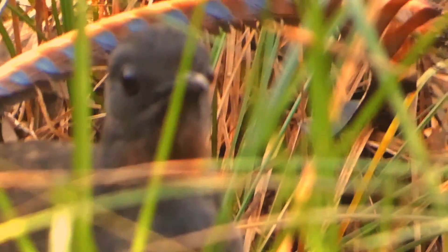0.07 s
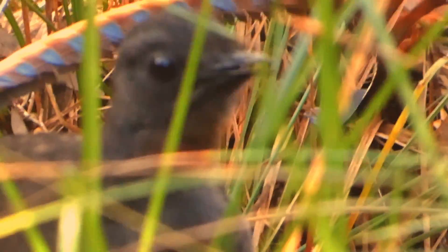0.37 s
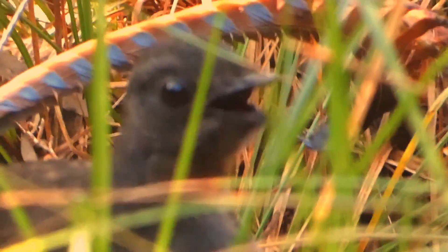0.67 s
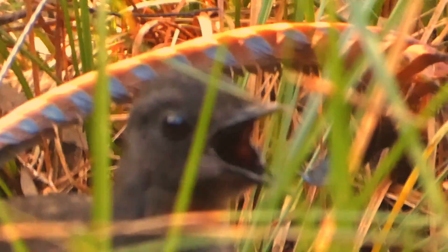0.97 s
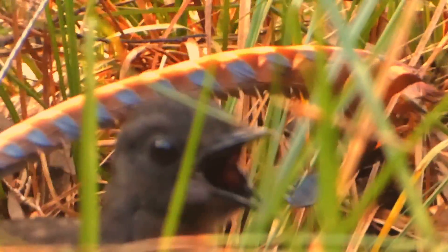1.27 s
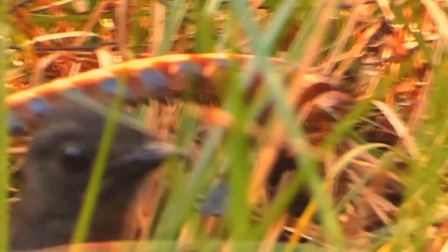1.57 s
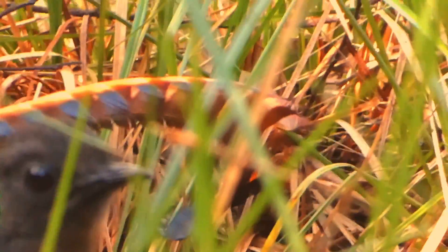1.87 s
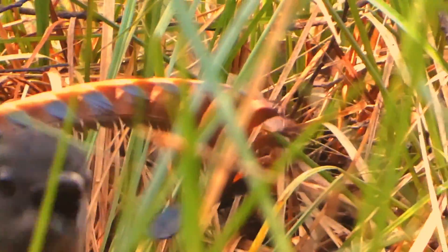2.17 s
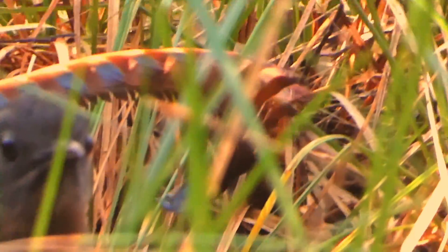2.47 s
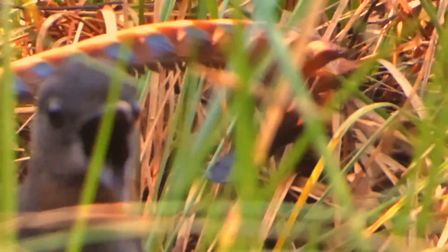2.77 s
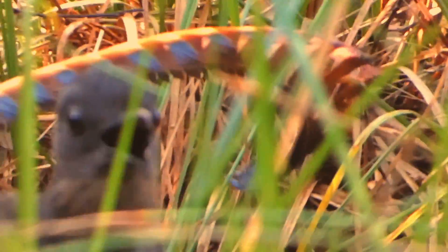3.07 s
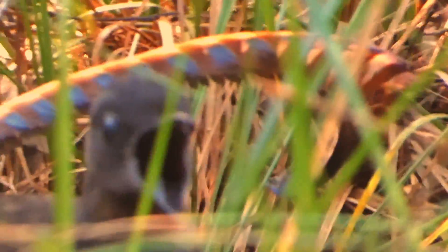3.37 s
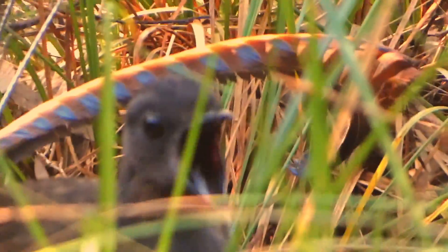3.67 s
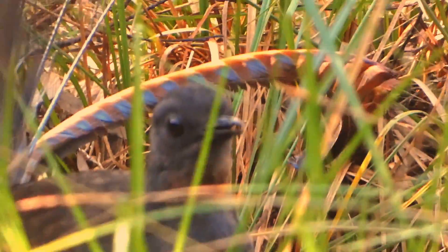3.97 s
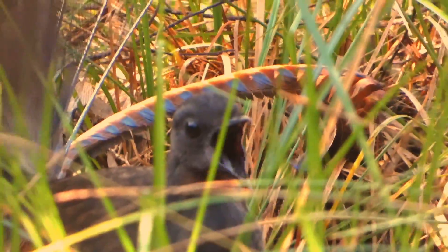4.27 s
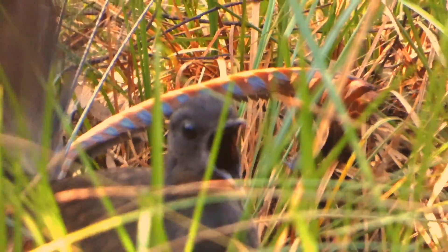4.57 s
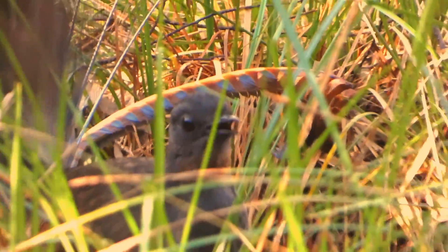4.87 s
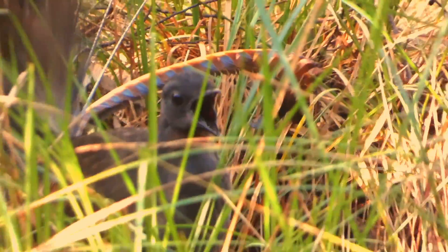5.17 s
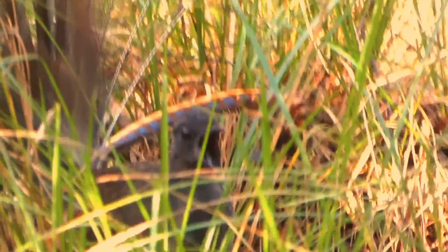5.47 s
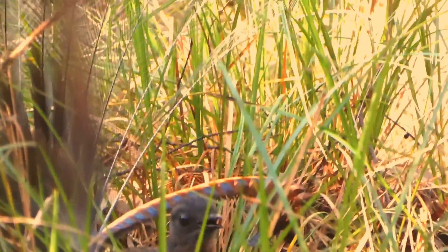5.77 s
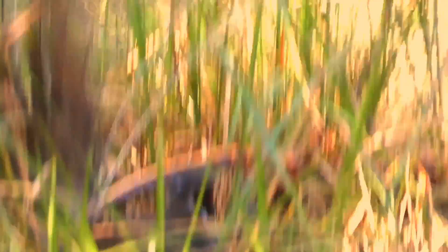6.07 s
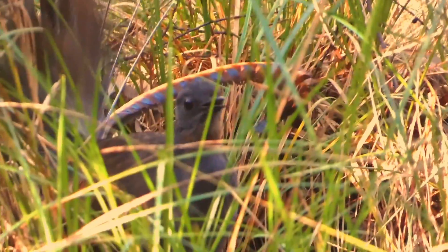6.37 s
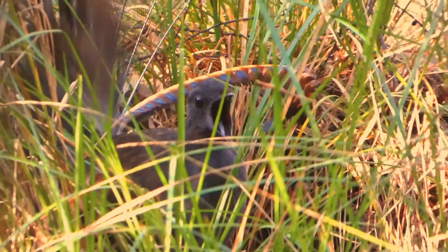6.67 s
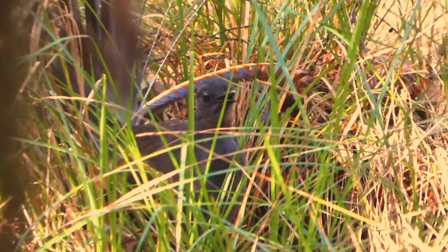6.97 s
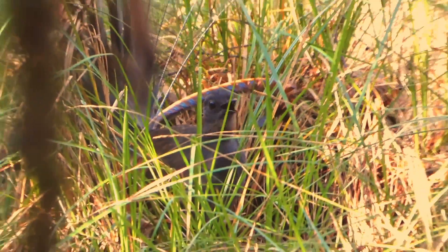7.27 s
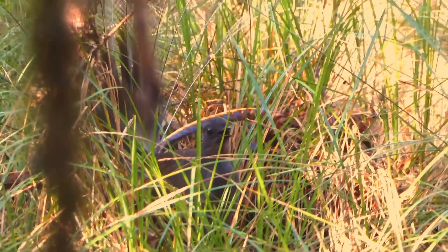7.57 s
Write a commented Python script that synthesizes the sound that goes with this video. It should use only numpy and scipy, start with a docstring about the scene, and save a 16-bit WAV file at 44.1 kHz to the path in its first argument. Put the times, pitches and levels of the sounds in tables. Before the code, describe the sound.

In a still forest, with faint air noise and far-off birds behind it, one nearby lyrebird calls from straight ahead. Four sharp clicks come first, then two clipped, buzzy squawks and two long downward whistles. Small croaks, a whip-like sweep and a swelling note lead to three quick rasping rattles, then a string of loud, mostly falling whistles. The calls are clear and leave a short natural ring.

```python
"""A faint rustle of air and far-off twittering birds lie under a lyrebird singing from the grass close by.
It opens with four clicks, snaps of air that set its syrinx ringing, then two hoarse squawks that buzz
through the windpipe. Whistles follow, gliding through the throat's resonance, the fastest like
whip-cracks, with pulsed croaks, rasping rattles and a few dry ticks among them.
Undergrowth scatters each call and the forest lets it ring on."""
import sys
import numpy as np
from scipy import signal
from scipy.fft import rfft, irfft
from scipy.io import wavfile

SR = 44100
rng = np.random.default_rng(int(sys.argv[2]) if len(sys.argv) > 2 else 0)


def master(y):
    """Save y as 16-bit WAV."""
    cut = np.clip(np.atleast_2d(y).T, -1, 1)
    pcm = np.round(cut * 32767)  # scale
    wavfile.write(sys.argv[1], SR, pcm.astype(np.int16))


N = 345303
HZ = np.fft.rfftfreq(N, 1 / SR)
TOP_HZ = 15750


def amp(db):
    """Decibels to gain."""
    return 10 ** (np.asarray(db) / 20)


def unit(x):
    """Scales to rms 1."""
    return x / np.sqrt(np.mean(x ** 2) + 1e-20)


def curve(points, hz, column=1):
    """Reads one column of a table on a log-frequency axis."""
    table = np.transpose(points)
    return np.interp(np.log(hz + 1), np.log(table[0] + 1), table[column])


def resonances(peaks):
    """Bell-shaped peaks as an EQ curve in dB."""
    return sum(db / (1 + (2 * (HZ - hz) / width) ** 2) for hz, width, db in peaks)


def noise(eq_db):
    """Noise of rms 1, coloured by an EQ curve."""
    return unit(irfft(rfft(rng.standard_normal(N)) * amp(eq_db), N))


def wander(n, hz):
    """Random modulation of rms near 1, changing hz times a second."""
    return np.interp(np.arange(n) * hz / SR, np.arange(32768), rng.standard_normal(32768))


def blur(n, width_hz):
    """Complex modulation of rms 1 that smears a tone into a band."""
    return (unit(wander(n, width_hz)) + 1j * unit(wander(n, width_hz))) / np.sqrt(2)


def add(mix, start_s, sound):
    """Mixes a sound in at start_s."""
    part = mix[max(round(start_s * SR), 0):][:len(sound)]
    part += sound[:len(part)]


def gate(t, length, attack, release):
    """Fades in from zero and has faded out again at length."""
    fade_in = np.sin(np.pi / 2 * np.clip(t / attack, 0, 1)) ** 2
    fade_out = np.sin(np.pi / 2 * np.clip((length - t) / release, 0, 1)) ** 2
    return fade_in * fade_out


def burst(t, peak_s):
    """Percussive envelope that reaches 1 at peak_s and dies away."""
    return (t / peak_s) ** 2 * np.exp(2 * (1 - t / peak_s))


# Colour of the air bed: freq_hz, gain_db
AIR_EQ = [(12, -85), (20, -56), (109, -14.5), (252, -17), (333, -10.5), (534, -8), (667, -5), (985, -9.5),
          (1300, -5.5), (1540, -29.5), (1720, -15), (2680, -22), (3000, -26), (7730, -35), (15500, -50.5)]
# Low hums in the bed: freq_hz, width_hz, boost_db
AIR_PEAKS = [(148.7, 20, 9.5), (337, 40, 10.5), (444.5, 9.3, 8)]
# How the bed's level changes over time: time_s, level_db
AIR_LEVEL = [(0.0, -53), (3.4, -52.5), (4.2, -52.5), (4.602, -57), (5.4, -54), (6.3, -58.5), (7.83, -59)]
# Stereo likeness of the bed: freq_hz, correlation
AIR_STEREO = [(50, 0.08), (300, 0.027), (700, 0.04), (1500, 0.057), (10000, 0.9)]
# Balance of the bed: freq_hz, left_minus_right_db
AIR_PAN = [(60, 3.5), (150, -1.5), (330, -6.5), (700, -4), (2000, -5), (10000, 2.5)]


def air(trim_db=2):
    """A faint, wide bed of distant rustle and hum, its level wavering gently."""
    colour = curve(AIR_EQ, HZ) + resonances(AIR_PEAKS)
    left, other = rfft(noise(colour)), rfft(noise(colour))
    likeness = np.clip(curve(AIR_STEREO, HZ), -1, 1)
    right = likeness * left + np.sqrt(1 - likeness ** 2) * other
    pan = amp(curve(AIR_PAN, HZ) / 2)
    bed = irfft(np.array([left * pan, right / pan]), N)
    bed_level_db = np.interp(np.arange(N) / SR, *np.transpose(AIR_LEVEL))
    return bed * amp(trim_db + bed_level_db + .8 * wander(N, 6))


# Steady background layers: start_s, end_s, centre_hz, width_hz, level_db
DRONE_BANDS = [(-0.5, 4.2, 654, 33, -57.5), (2.5, 9.4, 574.3, 31.3, -61.5), (4.502, 9.2, 238, 87.48, -68.5),
               (-0.5, 0.66, 112, 20.37, -68.5), (-0.5, 9, 40, 55.6, -85), (4.2, 9, 9260, 4320, -67.5)]


def drones():
    """Bands of faint noise: far hums, low rumbles and a thin hiss."""
    t, out = np.arange(N) / SR, np.zeros((2, N))
    for start, end, hz, width, db in DRONE_BANDS:
        band_db = np.maximum(-12 * ((HZ - hz) / width) ** 2, -100)
        envelope = amp(db) * gate(t - start, end - start, 0.063, 0.077)
        out += envelope * np.array([noise(band_db), noise(band_db)])
    return out


# Short reverb of the nearby grass: freq_hz, t60_s, level_db, stereo_correlation
GRASS_REVERB = [(496, 0.05, 6.5, 1), (1530, 0.08, -10.5, 0.45), (2890, 0.28, -3, 0.78), (5740, 0.33, -5, 1),
                (9930, 0.27, -0.5, 0.17), (15000, 0.17, 2, 0.18)]
# Long ring of the forest: freq_hz, t60_s, level_db, stereo_correlation
FOREST_REVERB = [(500, 0.85, -6, 0.2), (1390, 0.78, -6.5, 0.53), (2450, 1.056, -13, 0.76),
                 (3830, 1.01, -9, 0.96), (6800, 0.29, -12.5, 0.2), (14150, 0.59, -29, .3)]


def scatter(sound, bands, attack_s):
    """Many small echoes from stems and trunks, each band dying at its own speed."""
    taps = rng.standard_normal((2, SR)) * (rng.random((2, SR)) < 1 / 8)
    hz, t, spectra = signal.stft(unit(taps), SR, nperseg=256)
    t60, db, likeness = (curve(bands, hz, column=k)[:, None] for k in range(1, 4))
    likeness = np.clip(likeness, 0, 1)
    spectra[1] = likeness * spectra[0] + np.sqrt(1 - likeness ** 2) * spectra[1]
    equal_energy = np.sqrt(2 * np.log(1000) / (t60 * SR))
    spectra *= amp(db - 60 * t / t60) * equal_energy
    fade_in = np.clip(np.arange(SR) / SR / attack_s, 0, 1)
    tail = signal.istft(spectra, SR, nperseg=256)[1][:, :SR] * fade_in
    return signal.fftconvolve(sound[None], tail, axes=1)[:, :N]


# Thin notes and wheezes: start_s, length_s, first_hz, last_hz, width_hz, level_db
TWITTER_NOTES = [(.07, 0.062, 5100, 5800, 1190, -68), (0.22, 0.066, 5900, 6700, 600, -66),
                 (0.464, 0.063, 3100, 4720, 405, -65), (0.818, 0.043, 3540, 3340, 403, -64),
                 (1.044, .11, 6000, 7000, 1250, -63.5), (1.24, 0.061, 3260, 2960, 910, -52),
                 (1.553, 0.047, 4210, 4400, 412, -62.5), (1.593, 0.17, 7000, 6860, 1860, -67.5),
                 (4.067, 0.19, 7150, 8450, 843, -63.5), (4.44, .1, 5840, 6040, 903, -59.5),
                 (6.852, 0.18, 7580, 8240, 580, -64.5), (7.504, 0.28, 1520, 1488, 106.7, -41),
                 (7.557, 0.13, 4480, 4670, 2020, -50)]


def twitters():
    """Far-off birds, each note a glide blurred into a band of noise."""
    out = np.zeros(N)
    for start, length, first_hz, last_hz, width, db in TWITTER_NOTES:
        n = int(length * SR)
        glide = np.exp(2j * np.pi * np.cumsum(np.linspace(first_hz, last_hz, n)) / SR)
        note = unit((glide * blur(n, width)).real)
        add(out, start, amp(db) * note * signal.windows.tukey(n, .6))
    return out


# Dry ticks: start_s, level_db
TICK_HITS = [(4.2436, -43), (4.301, -35.5), (6.824, -36)]
# Their bright colour: freq_hz, gain_db
TICK_EQ = [(1000, -17), (3000, -5), (6000, 4), (10000, 1.5), (15000, -21)]


def ticks(decay_s=0.0018):
    """Tiny bright bursts of noise, perhaps the beak or a dry stem."""
    envelope = np.zeros(N)
    for start, db in TICK_HITS:
        add(envelope, start, amp(db) * np.exp(-np.arange(1000) / SR / decay_s))
    return envelope * noise(curve(TICK_EQ, HZ))


# Rough breath in croaks, rattles and the tails of clicks: freq_hz, gain_db
RASP_EQ = [(300, -54.5), (600, -14), (950, -5), (1250, -23.5), (1520, -12), (1900, 6), (2900, -1.5),
           (3300, -4.5), (3900, 1), (4400, -4), (5200, -0.5), (7000, -11.5), (7700, -15.5), (8700, -28),
           (12000, -21), (15000, -40)]
# Croaks, the shortest a single pulse: start_s, length_s, pitch_hz, tone_db, breath_db
CROAK_RUNS = [(3.343, 0.01, 1610, -28, -31.5), (3.356, 0.03, 1815, -28, -29),
              (3.429, 0.004, 2270, -36, -33.5), (3.443, 0.02, 1390, -32, -33),
              (5.105, 0.024, 2030, -36, -41.5), (5.152, 0.004, 1960, -30, -39),
              (5.18, 0.004, 1060, -43.5, -48), (5.226, 0.004, 2140, -34, -50),
              (6.813, 0.028, 2576, -24, -40)]


def croaks(rate_hz=180, pulse_s=0.0036, fade_db=-7.5, pitch_spread=0.14, uneven_db=2):
    """Short fading runs of syrinx pulses, each a few cycles of tone with a puff of rough air."""
    out, breath, t = np.zeros(N), np.zeros(N), np.arange(-1000, 1000) / SR
    for start, length, hz, tone_db, breath_db in CROAK_RUNS:
        for delay in np.arange(0, length, 1 / rate_hz):
            size, detune = rng.standard_normal(2)
            pulse = amp(fade_db * delay / length + uneven_db * size) * np.exp(-2 * (t / pulse_s) ** 2)
            tone = np.sqrt(2) * np.sin(2 * np.pi * hz * (1 + pitch_spread * detune) * t)
            add(out, start + delay + t[0], amp(tone_db) * pulse * tone)
            add(breath, start + delay + t[0], amp(breath_db) * pulse)
    return out + breath * noise(curve(RASP_EQ, HZ))


# Hoarse squawks: start_s, length_s, level_db
SQUAWK_CALLS = [(2.013, 0.038, -34.5), (2.23, 0.0383, -33.5)]
# Their broad colour: freq_hz, gain_db
SQUAWK_EQ = [(240, -63), (400, -40), (1250, -10.5), (1520, -34.5), (1970, -17.5), (2510, -18.5),
             (2740, -22), (3720, -23), (4960, -16), (6610, -24.5), (9660, -19.5), (12900, -34),
             (15000, -59)]
# Formants of the windpipe: freq_hz, width_hz, boost_db
WINDPIPE_PEAKS = [(1150, 120, 2), (1880, 340, 16), (2465, 380, 14), (3000, 310, 15.5), (3710, 380, 17.5),
                  (4916, 180, 12.5)]


def squawks(top_pitch_hz=252, arch=0.0727, voiced_share=0.81):
    """A hoarse buzz with an arching pitch swells through the windpipe's resonances and is cut off."""
    voice, breath, t = np.zeros(N), np.zeros(N), np.arange(3000) / SR
    for start, length, db in SQUAWK_CALLS:
        swell = amp(db) * gate(t, length, 0.016, 0.0011)
        hz = top_pitch_hz * (1 - arch * (2 * t / length - 1) ** 2)
        phase = 2 * np.pi * np.cumsum(hz) / SR
        buzz = sum(np.cos(k * phase + rng.uniform(0, 2 * np.pi)) for k in range(1, 56))
        add(voice, start, swell * unit(buzz))
        add(breath, start, swell)
    source = np.sqrt(voiced_share) * voice + np.sqrt(1 - voiced_share) * breath * rng.standard_normal(N)
    windpipe = unit(amp(curve(SQUAWK_EQ, HZ) + resonances(WINDPIPE_PEAKS)))
    return irfft(rfft(source) * windpipe, N)


# Rattles: start_s, length_s, chirp_s, rate_hz, first_hz, last_hz, tone_db, tone_length_s, breath_db
RATTLE_CALLS = [(4.227, 0.16, 0.0019, 72, 2130, 1787, -33.5, 0.15, -43.5),
                (5.255, 0.16, 0.015, 140, 2158, 1603, -24.5, 0.083, -38),
                (5.398, 0.18, 0.0176, 160, 2220, 1534, -23, 0.088, -35.5),
                (5.56, 0.13, 0.017, 150, 2215, 1525, -21, 0.084, -32)]


def rattles(chirp_depth=0.583, fade_db_per_s=-85, breath_fade_db=-5, breath_pulsing=0.35,
            sideband_db=-11, smear_hz=260, breath_lead_s=0.0057):
    """A rising chirp breaks into a fast train of fading pulses whose pitch sags, wrapped in rough air."""
    out, breath = np.zeros(N), np.zeros(N)
    for start, length, chirp_s, rate, first_hz, last_hz, tone_db, tone_s, breath_db in RATTLE_CALLS:
        t = np.arange(0, length, 1 / SR)
        broken = np.clip((t - chirp_s) / 0.0054 + 1, 0, 1)  # 0 in the chirp, 1 in the pulse train
        cycles = np.cumsum(broken * rate * (1 + .07 * wander(len(t), 100))) / SR
        pulse = np.sin(np.pi * cycles) ** 6 * amp(1.8 * wander(len(t), 170))
        chirp = 1 + (1 - broken) * chirp_depth * (np.sqrt(t / chirp_s) - .7)
        hz = (first_hz + (last_hz - first_hz) * t / length) * chirp
        phase = 2 * np.pi * np.cumsum(hz * (1 + .03 * broken * wander(len(t), 700))) / SR
        envelope = amp(tone_db + fade_db_per_s * t) * gate(t, tone_s, .011, 0.02)
        tone = envelope * (1 - broken + broken * pulse) * np.sin(phase)
        push = amp(breath_db + breath_fade_db * t / length) * gate(t, length, 0.017, 0.051)
        # strong and weak cycles alternate unevenly: smeared tones an octave below and a fifth above
        sidebands = amp(sideband_db) * (np.exp(.5j * phase) + np.exp(1.5j * phase))
        add(out, start, np.sqrt(2) * tone + push * (sidebands * blur(len(t), smear_hz)).real)
        add(breath, start - breath_lead_s, push * (1 + breath_pulsing * (2 * pulse - .5)))
    return out + breath * noise(curve(RASP_EQ, HZ))


# Opening clicks: start_s, low_hz, high_hz, attack_db, held_db, held_s, snap_db, tail_db
CLICK_CALLS = [(0.2681, 1657, 2354, -28, -28.5, 0.04, -30.5, -54),
               (0.569, 1757, 2454, -21.5, -23, 0.029, -26.5, -47),
               (0.9451, 1757, 2400, -20.5, -30, 0.027, -23, -50),
               (1.298, 1755, 3270, -35, -66, .01, -33.5, -39)]
# Colour of the snap of air: freq_hz, gain_db
SNAP_EQ = [(300, -48.5), (700, -3), (1200, -7.5), (2000, 10), (4200, -1), (5200, -16), (6300, -42),
           (7700, -5.5), (8500, -23), (9500, -13), (11500, -29), (15000, -36)]
# A notch and four peaks in the snap: freq_hz, width_hz, gain_db
SNAP_BELLS = [(2750, 110, -17), (3240, 240, 3.5), (4240, 460, 3.5), (4900, 420, 7.5), (9250, 400, 8.5)]


def clicks(tone_peak_s=0.0027, snap_peak_s=0.0024, low_fade_db=-10, high_attack_db=-2,
           held_breath_db=-11, tail_decay_s=0.04):
    """A snap of air starts a rough tone on each side of the syrinx; both die or hold, rising slightly."""
    out, snaps, tails, t = np.zeros(N), np.zeros(N), np.zeros(N), np.arange(6000) / SR
    for start, low_hz, high_hz, attack_db, held_db, held_s, snap_db, tail_db in CLICK_CALLS:
        attack = amp(attack_db) * burst(t, tone_peak_s)
        held = amp(held_db) * gate(t, held_s, 0.021, 0.0034)
        low_envelope = attack + amp(low_fade_db * t / held_s) * held
        high_envelope = amp(high_attack_db) * attack + held
        for hz, envelope in ((low_hz, low_envelope), (high_hz, high_envelope)):
            rough_rise = .98 + t + .03 * wander(len(t), 900)
            phase = 2 * np.pi * np.cumsum(hz * rough_rise) / SR
            add(out, start, np.sqrt(2) * envelope * np.sin(phase))
        add(snaps, start, amp(snap_db) * burst(t, snap_peak_s) + amp(held_breath_db) * held)
        add(tails, start, amp(tail_db) * np.exp(-t / tail_decay_s) * gate(t, t[-1], 0.00078, 0.052))
    snap_noise = noise(curve(SNAP_EQ, HZ) + resonances(SNAP_BELLS))
    return out + snaps * snap_noise + tails * noise(curve(RASP_EQ, HZ))


# Resonance of the throat, loudest in the middle of the range: freq_hz, gain_db
THROAT_EQ = [(700, -32), (1100, -13), (1350, -17), (1750, -5), (2400, -1), (3200, -5), (3900, -18.5),
             (5000, -12.5)]
# How the open beak passes overtones: freq_hz, gain_db
BEAK_EQ = [(2000, -9), (4700, -12), (5400, -3), (6200, 1), (7700, -12), (9300, 3), (10500, 1), (13000, -5),
           (14000, -14), (15500, -20)]
# Whistles, levels before throat and beak: start_s, length_s, pitch_hz at five evenly spaced moments,
# level_db, swell_db, attack_s, release_s, overtone_db
WHISTLE_NOTES = [ (2.607, 0.2, 3550, 2133, 1640, 1440, 1084, -20.5, -9, 0.084, 0.0035, -20.5),
                 (2.814, 0.021, 1500, 1985, 2450, 2660, 2680, -36.5, 5, 0.004, 0.0028, -15.5),
                 (2.822, 0.27, 2590, 2390, 1765, 1406, 990, -18, -1.5, 0.053, 0.015, -24),
                 (3.639, 0.062, 1045, 1233, 1750, 2220, 2970, -10, -10, 0.054, 0.0086, -22.5),
                 (3.708, 0.07, 5130, 3582, 2520, 1486, 725, -14.5, -9.5, 0.016, 0.018, -28.5),
                 (4.476, 0.26, 2240, 2174, 2279, 2400, 2474, -23.5, 16.5, 0.03, 0.0042, -31.5),
                 (4.736, 0.09, 2805, 3162, 3250, 3240, 2980, -28.5, -13, 0.0068, 0.02, -29),
                 (5.892, 0.11, 2870, 2532, 2240, 1666, 940, -14.5, -2.5, 0.037, 0.045, -24.5),
                 (6.008, 0.089, 996, 1138, 1435, 1708, 1630, -20.5, 18.5, 0.0063, 0.034, -11.5),
                 (6.099, 0.18, 3337, 3060, 2473, 1971, 1790, -15.5, 7.5, 0.0097, 0.042, -27.5),
                 (6.603, 0.092, 2080, 2145, 2004, 1649, 730, -17.5, -2, 0.027, 0.018, -27.5),
                 (6.712, 0.086, 3985, 2980, 2124, 1113, 763, -16, -10.5, 0.0064, 0.0078, -23.5),
                 (7.097, 0.2, 2418, 2107, 1592, 1098, 760, -10.5, 13.5, 0.015, 0.085, -28.5),
                 (7.441, 0.048, 2500, 2252, 2080, 1630, 1115, -12.5, 6, 0.031, 0.024, -26),
                 (7.494, 0.059, 3630, 2920, 2466, 1690, 775, -14.5, 5.5, 0.015, 0.031, -27.5),
                 (7.69, 0.069, 2980, 2983, 2976, 3022, 2960, -15, 0.5, 0.021, 0.015, -31.5),
                 (7.744, 0.097, 3150, 3388, 3214, 2794, 2390, -18.5, -11.5, 0.015, 0.005, -26), ]


def whistles(jitter=0.0025, flutter_db=1.35, flutter_hz=88, press_db_per_octave=10, pivot_hz=2400,
             upper_db=-3, step_db=-4.5, odd_db=-5, breath_db=-14):
    """A nearly pure tone glides through the throat; weak, unsteady overtones leave through the beak."""
    out, breath = np.zeros(N), np.zeros(N)
    for start, length, *pitches, db, swell_db, attack, release, overtone_db in WHISTLE_NOTES:
        t = np.arange(0, length, 1 / SR)
        glide = np.polyfit(np.linspace(0, length, len(pitches)), np.log(pitches), len(pitches) - 1)
        hz = np.exp(np.polyval(glide, t)) * (1 + jitter * wander(len(t), 500))
        tremble_db = flutter_db * wander(len(t), flutter_hz)
        level_db = db + swell_db * (t / length - .5) + curve(THROAT_EQ, hz) + tremble_db
        envelope = amp(level_db) * gate(t, length, attack, release)
        # high and loud notes are pressed harder, so their overtones grow
        press_db = overtone_db + press_db_per_octave * np.log2(hz / pivot_hz)
        brightness = amp(press_db) * (envelope / envelope.max()) ** .2
        phase = 2 * np.pi * np.cumsum(hz) / SR
        tone = np.sin(phase)
        for k in range(2, 8):
            rolloff_db = (k > 2) * (upper_db + step_db * (k - 3)) + odd_db * (k % 2)
            shimmer = (.8 + .6 * blur(len(t), 550)) * amp(4 * wander(len(t), 60))
            overtone = (np.exp(1j * k * phase) * shimmer).imag * (k * hz < TOP_HZ)
            tone += brightness * amp(rolloff_db + curve(BEAK_EQ, k * hz)) * overtone
        add(out, start, np.sqrt(2) * envelope * tone)
        add(breath, start, envelope * amp(overtone_db + breath_db))
    return out + breath * noise(curve(BEAK_EQ, HZ))


def scene():
    """The birds and their echoes sit almost dead centre, over a wide bed of air and drones."""
    song = whistles() + clicks() + squawks() + croaks() + rattles() + ticks() + twitters()
    echoes = scatter(song, GRASS_REVERB, attack_s=0.0014) + scatter(song, FOREST_REVERB, attack_s=0.0033)
    return (song + echoes) * amp([[-.45], [.45]]) + air() + drones()


def record(dry):
    """A steep low-pass takes off the treble above TOP_HZ."""
    low_pass = signal.firwin(511, TOP_HZ, window=("kaiser", 9), fs=SR)
    return signal.oaconvolve(dry, low_pass[None], "same")


dry = scene()
out = record(dry)
master(out)
```